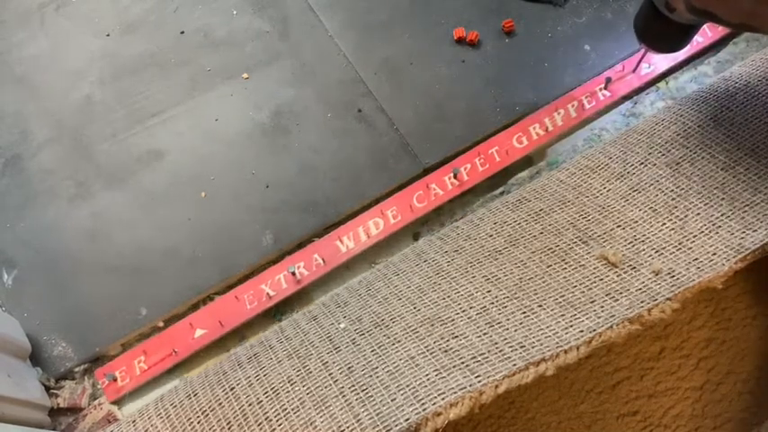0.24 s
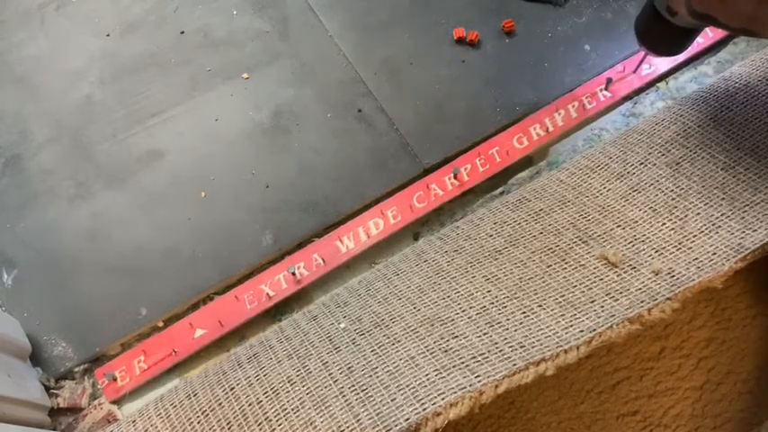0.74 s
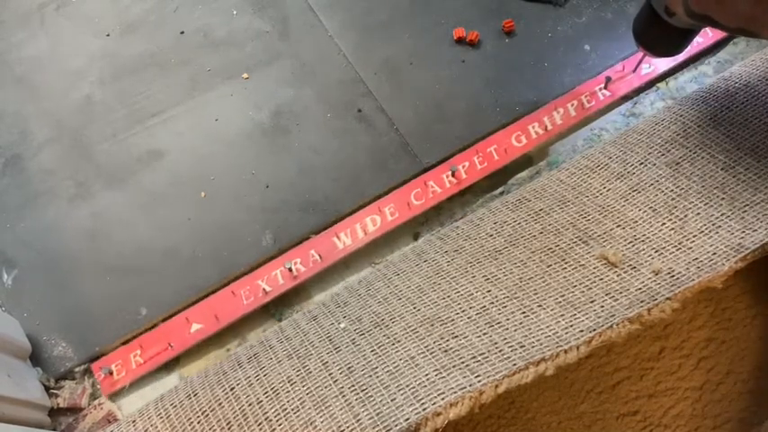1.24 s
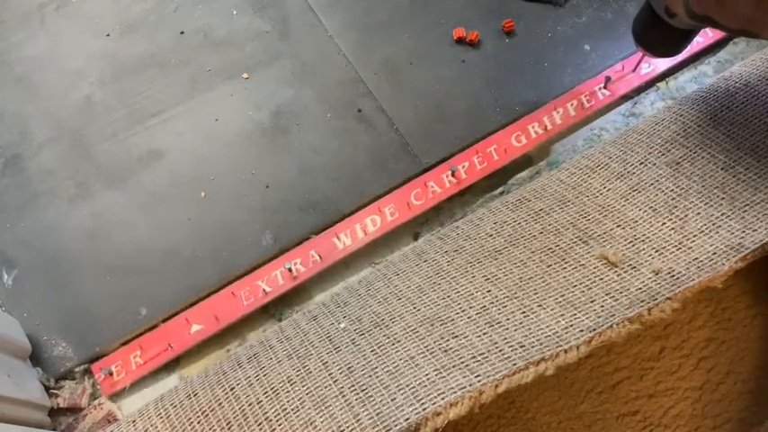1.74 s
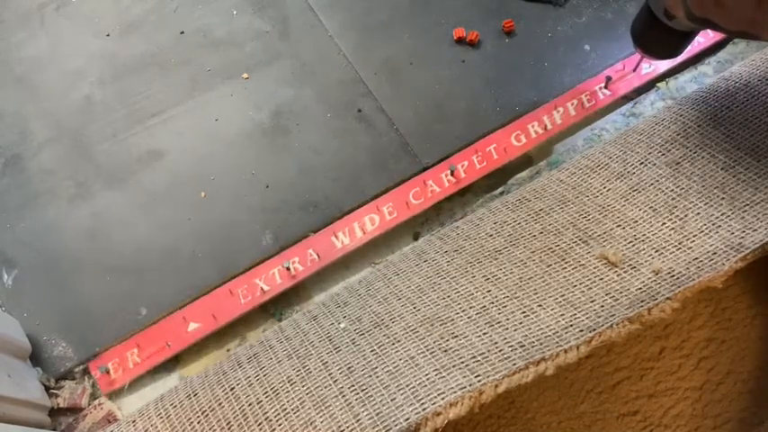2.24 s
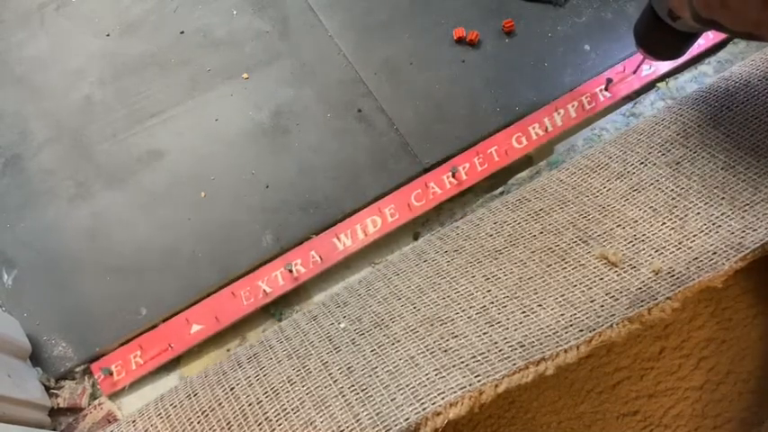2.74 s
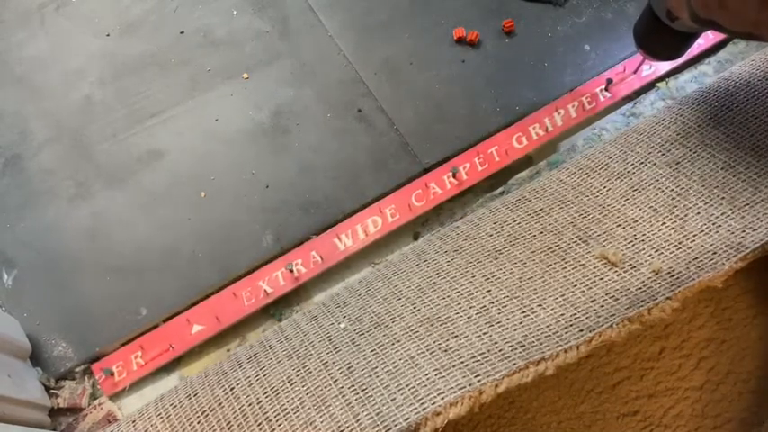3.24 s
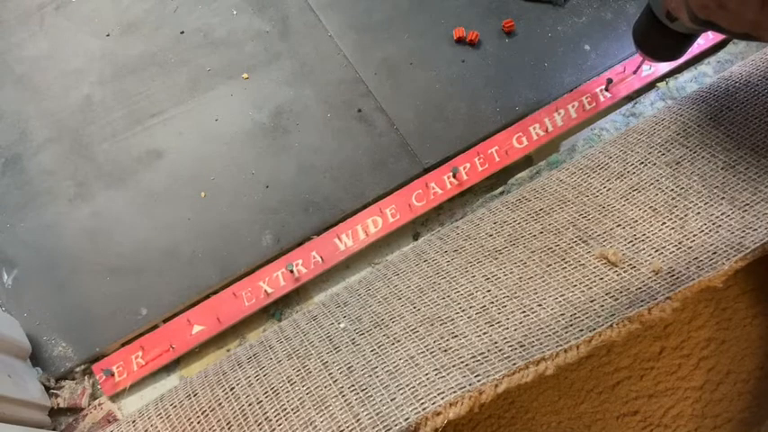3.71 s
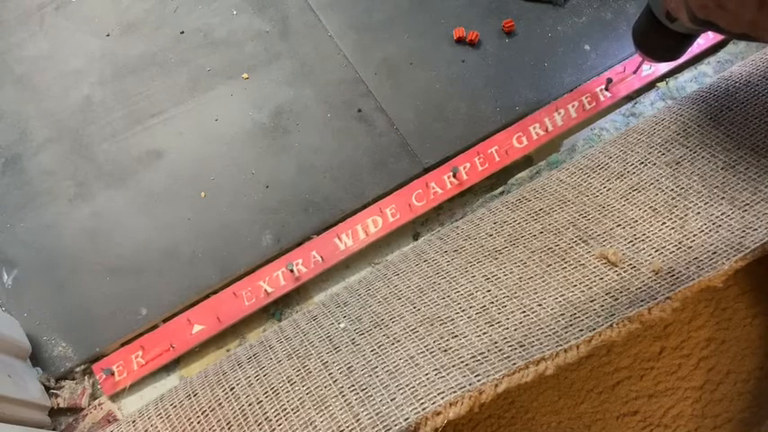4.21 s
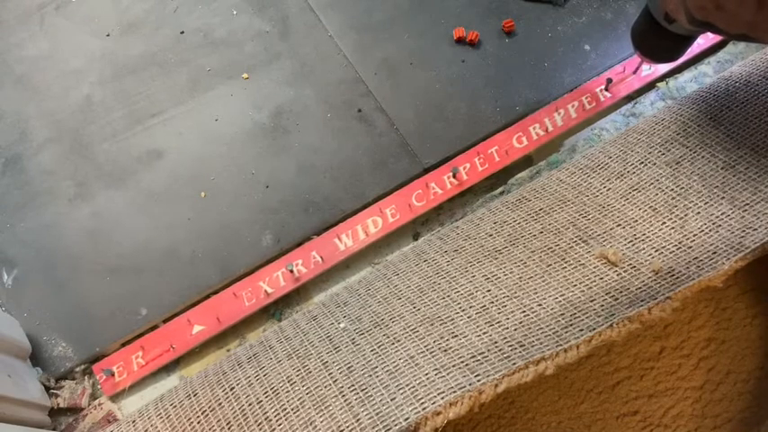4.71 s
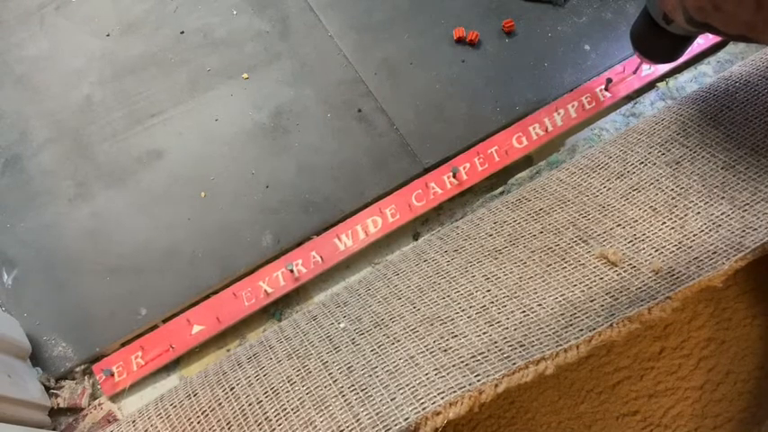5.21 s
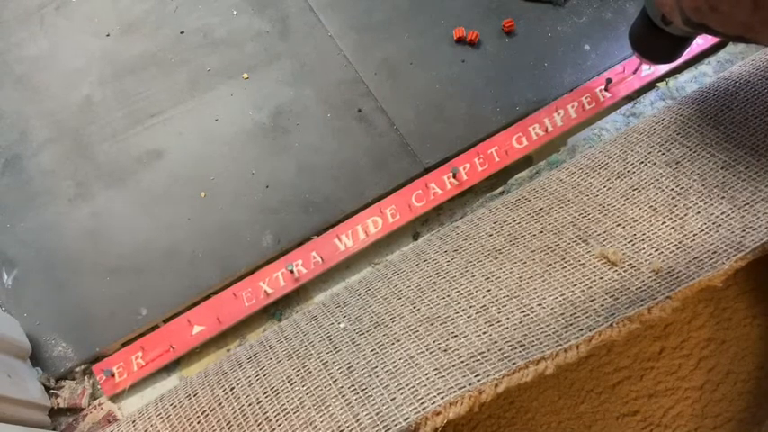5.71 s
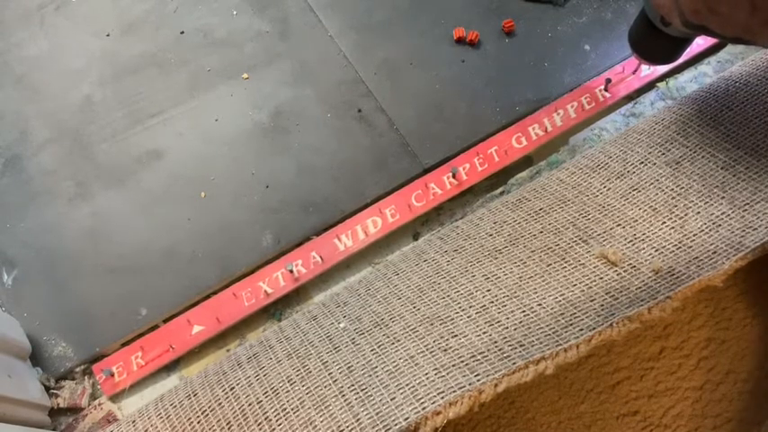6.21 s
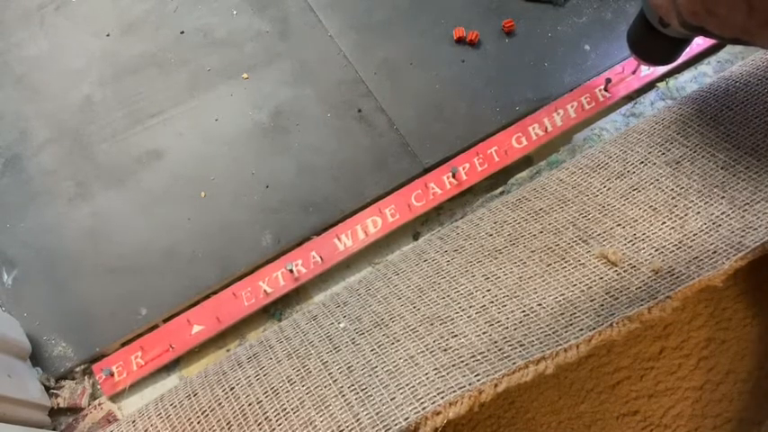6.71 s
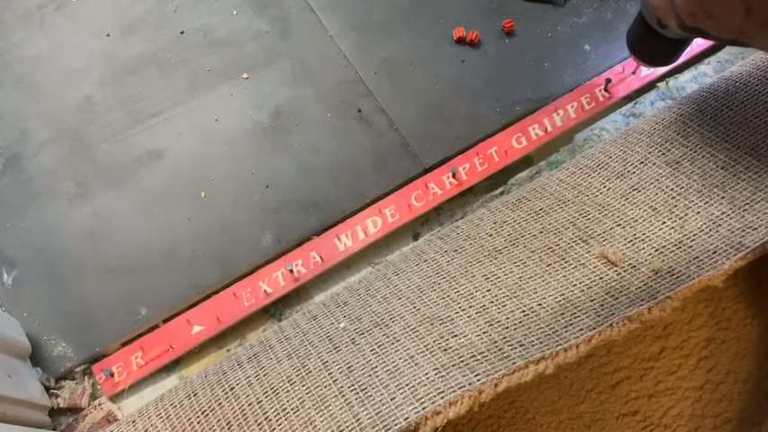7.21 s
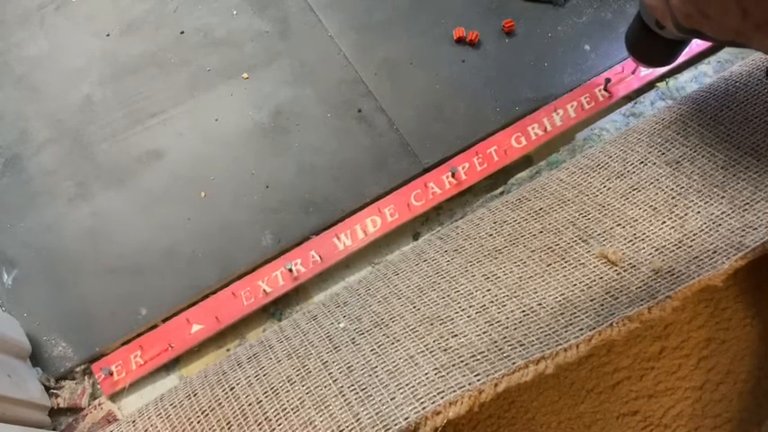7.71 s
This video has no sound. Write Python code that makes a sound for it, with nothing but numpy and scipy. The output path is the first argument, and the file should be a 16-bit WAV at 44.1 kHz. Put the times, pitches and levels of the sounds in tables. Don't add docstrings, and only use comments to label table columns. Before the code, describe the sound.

A hammer drill is already running at full tilt and never stops. Very fast blows fuse into a buzzing hum with a hard whine above, wrapped in crunching concrete and hissing grit. Around five seconds it bogs down to a lower pitch and continues with rough little flutters. Close stereo microphones in a bare, reflective room.

```python
import sys
import numpy as np
from scipy import signal
from scipy.fft import rfft, irfft, next_fast_len
from scipy.io import wavfile
from scipy.ndimage import uniform_filter1d, map_coordinates

SR = 44100
rng = np.random.default_rng(int(sys.argv[2]) if len(sys.argv) > 2 else 0)


def to_wav(sig):
    pcm = np.clip(np.atleast_2d(sig), -1, 1) * 32767
    pcm = np.round(pcm).astype(np.int16)
    wavfile.write(sys.argv[1], SR, pcm.T)


def ratio(d):
    e = np.asarray(d, float) / 20
    return 10 ** e


N = 350595
TEETH = 15


def unit(x):
    return x / np.sqrt(np.mean(x ** 2) + 1e-20)


def along(points, hz):
    f, v = np.transpose(points)
    return np.interp(np.log(hz + 1), np.log(f + 1), v)


def curve(rows):
    s, value = np.transpose(rows)
    return np.interp(np.arange(N) / SR, s, value)


def moments(rows, width_s):
    t = np.arange(0, N + 64, 64) / SR
    bells = sum(h * np.exp(-((t - s) / width_s) ** 2) for s, h in rows)
    return np.interp(np.arange(N) / SR, t, bells)


def wobble(rate_hz):
    coarse = np.arange(0, N + 64, 64)
    knots = rng.standard_normal(int(N * 200 / SR) + 8)
    values = map_coordinates(knots, [coarse * min(rate_hz, 200) / SR])
    return np.interp(np.arange(N), coarse, values)


def filtered(x, response):
    m = next_fast_len(N + SR // 2)
    return irfft(rfft(x, m) * response(np.fft.rfftfreq(m, 1 / SR)), m)[..., :N]


def causal(spectrum):
    def response(hz):
        cepstrum = irfft(np.log(ratio(along(spectrum, hz)) + 1e-6))
        half = len(cepstrum) // 2
        cepstrum[1:half] *= 2
        cepstrum[half + 1:] = 0
        return np.exp(rfft(cepstrum))
    return response


def patchy(x, depth_db):
    z = signal.stft(x, nperseg=128)[2]
    field = rng.standard_normal(z.shape)
    field = uniform_filter1d(uniform_filter1d(field, 6, 0), 24, 1)
    return signal.istft(z * ratio(depth_db * unit(field)), nperseg=128)[1][:N]


# time in seconds, blows per second.
RATCHET_HZ = [(0.0, 268.7), (1.05, 262.0), (1.24, 265.2), (1.47, 264.3), (1.6, 265.9), (2.49, 259.0),
              (3.09, 262.7), (3.4, 261.7), (3.53, 255.1), (4.22, 261.8), (4.98, 256.4), (5.21, 244.7),
              (5.23, 230.9), (5.6, 223.2), (6.48, 222.3), (7.3, 223.0), (7.59, 219.4), (7.95, 219.3)]
# time in seconds, change in blows per second.
CATCHES_HZ = [(.02, 1.5), (.34, .5), (.66, -2.5), (.92, 2.5), (1.74, -2.5), (1.9, -2.5), (2.28, 2.03),
              (3.82, 1.33), (4.03, -3), (4.47, 2.35), (4.66, -0.8), (4.9, -2.76), (5.34, 3), (5.74, -1),
              (5.83, 3), (6.0, -1.5), (6.06, 0.5), (6.13, 0), (6.4, 3.14), (6.72, 2), (6.83, -0.5),
              (6.92, 1), (7.02, -1), (7.08, 0.5), (7.17, -0.36), (7.22, 0.9), (7.37, -1.35)]


def ratchet_speed():
    return curve(RATCHET_HZ) + moments(CATCHES_HZ, width_s=.05)


def ratchet_turns(rate):
    runout_hz = 1.5 * np.sin(2 * np.pi * np.cumsum(rate) / SR / TEETH + 1.3 * wobble(3))
    return np.cumsum(rate + runout_hz + 0.8 * wobble(50)) / SR


# multiple of the blow rate, level in dB.
FREE_ORDERS_DB = [(1, 11), (2, 2), (3, -4.5), (4, -0.5), (5, 0), (6, 0), (7, -2.5), (8, -8.5), (9, -1),
                  (10, -8.5), (11, -7), (12, -6), (13, -9), (14, -38), (15, -36), (16, -8.5)]
# multiple of the blow rate, level in dB.
LOADED_ORDERS_DB = [(1, 8.5), (2, 6), (3, -1), (4, -6), (5, 2), (6, -3), (7, -6), (8, -4), (9, -9.5),
                    (10, -5.5), (11, -8.5), (12, -31), (13, -8.5), (14, -12), (15, -17), (16, -39)]
# centre in Hz, half width in Hz, gain in dB.
STANDING_WAVES_DB = [(222.5, 3.3, -6.5), (262.5, 1.58, -7.9), (277, 0.67, -15), (442.9, 1.8, -15),
                     (516, 3.1, -12.5), (529, 1.8, -7), (546, 3.7, 15), (685, 7.8, -9), (663.8, 6.3, 4.5),
                     (780.5, 5.4, -16), (785.4, 12.4, 7), (798.5, 1.1, -25),
                     (1054.5, 3.4, -5), (1098, 5.4, -5.3), (1235, 20, 5), (1296.7, 8, -7), (1320, 6, -8),
                 (1554, 4, -3), (1580, 13, 2), (1612, 11, -5), (1835, 14, 3), (1985, 30, 6), (2285, 30, 3),
                 (2394, 16, 6), (3159, 27, 5), (3240, 22, 11)]


def orders(rate, load):
    ring_db, settle_s = -37.5, 0.016
    sink_hz_per_s, sink_ends_s = 0.6, 2.3
    hz = np.arange(0, 5000, .25)
    waves_db = sum(db * np.exp(-((hz - c) / w) ** 2) for c, w, db in STANDING_WAVES_DB)
    raised_hz = sink_hz_per_s * np.clip(sink_ends_s - np.arange(N) / SR, 0, None)
    levels_db = []
    for k, ((_, free), (_, loaded)) in enumerate(zip(FREE_ORDERS_DB, LOADED_ORDERS_DB), start=1):
        order_hz = k * rate - (k == 1) * raised_hz
        lag = int(settle_s * SR / k)
        passed_db = np.interp(order_hz, hz, waves_db)
        passed_db = uniform_filter1d(passed_db, 2 * lag + 1, origin=lag, mode="nearest")
        levels_db.append(ring_db + free + load * (loaded - free) + passed_db)
    return levels_db


# time in seconds, change in dB.
SKIPS_DB = [(5.48, -2), (5.58, 1), (5.75, -2), (6.22, -8), (6.32, 1.5), (6.37, -5), (6.51, -2), (6.63, 0),
            (6.7, 0), (6.83, -6), (6.9, -0.5), (7.16, -8), (7.22, -1), (7.5, -5)]


def floor_hum(turns, orders_db):
    skip_db = moments(SKIPS_DB, width_s=.018)
    hum = 0
    for k, db, lag in zip((1, 2, 3), orders_db, (2.1, .3, .3)):
        swell_db = 0.88 * k * np.sin(2 * np.pi * turns / TEETH + 3.7 * wobble(1.9))
        level_db = db + 2.5 + skip_db + 0.47 * k * wobble(28) + swell_db
        hum = hum + ratio(level_db) * np.cos(2 * np.pi * k * turns + lag)
    return hum


def whine(turns, orders_db):
    tones = 0
    for k, db in enumerate(orders_db[3:], start=4):
        beat_db = 1.5 * np.sin(2 * np.pi * turns / TEETH + 2.7 * wobble(3))
        level_db = db + 1.35 * wobble(45) + beat_db
        drift = 0.24 * wobble(3.3) + 0.0097 * k * k * wobble(60)
        tones = tones + ratio(level_db) * np.cos(2 * np.pi * k * turns - 0.47 * k + drift)
    return ratio(5.0) * tones


def blows(turns, jitter_s):
    tooth = np.arange(1, int(turns[-1]))
    at = np.interp(tooth, turns, np.arange(N)) + jitter_s * SR * rng.standard_normal(len(tooth))
    worn_db = rng.standard_normal(TEETH)[tooth % TEETH]
    return np.bincount(np.clip(np.round(at).astype(int), 0, N - 1), ratio(worn_db), N)


def after(spikes, decay_s):
    t = np.arange(SR // 50) / SR
    swell = np.exp(-t / decay_s) * (1 - np.exp(-t / 0.00031))
    return unit(signal.fftconvolve(spikes, swell)[:N])


# time in seconds, level in dB.
LEAN_DB = [(0, 2), (.07, 0.5), (.5, 0), (1.5, 0.5), (2.4, .5), (3.4, 0), (4.4, 0), (4.9, 0), (5.15, .5),
           (5.35, 0.5), (5.7, 0), (6.8, 1), (7.95, 0.5)]


def pressed(free_db, loaded_db, load):
    return free_db + load * (loaded_db - free_db) + curve(LEAN_DB)


# frequency in Hz, level in dB per Hz.
KNOCK_COLOUR_DB = [(500, -30), (850, -16), (1030, -10.5), (1300, -2), (1590, -11.5), (2060, -2),
                   (2420, -11.5), (2930, -10), (5000, -7), (6500, -46), (11000, -120)]


def body_knock(spikes):
    return unit(filtered(spikes, causal(KNOCK_COLOUR_DB)))


# frequency in Hz, level in dB per Hz.
GRIND_COLOUR_DB = [(24, -78), (40, -89), (150, -26), (240, -11.5), (330, -17), (480, -14), (640, -21),
                   (900, -18.5), (1280, -12.5), (1600, -8), (2500, -10.5), (4000, -13), (5200, -17.5),
                   (8800, -120)]


def crushing(spikes):
    noise = (0.71 + after(spikes, decay_s=0.0019)) * rng.standard_normal(N)
    return unit(filtered(noise, lambda hz: ratio(along(GRIND_COLOUR_DB, hz))))


# time in seconds, dB over the rumble.
JARS_DB = [(0, 5), (1.13, -1), (1.28, 4), (1.68, 0), (2.0, 3), (2.3, -5), (3.5, 3), (3.81, -2), (4.01, 0),
           (4.35, 3), (4.72, 4), (4.86, 2), (5.02, 5.5), (5.12, 7), (5.36, 12), (5.52, 9), (5.75, 4),
           (6.0, 3), (6.23, 6), (6.38, 8), (6.75, 9), (7.0, 6), (7.16, 1), (7.5, -1), (7.72, 0), (7.95, 5)]


def rumble_level(rate, load, hum_db):
    light_hz, light_db_per_hz = 259.4, -0.53
    level_db = pressed(-51.5, -56, load) + 0.15 * (hum_db - hum_db.max())
    level_db = level_db + 2.5 * wobble(22) + moments(JARS_DB, width_s=0.059)
    return level_db + light_db_per_hz * np.clip(rate - light_hz, 0, None)


def body(spikes, knock_db, rumble_db):
    crush = crushing(spikes)
    rumble = filtered(crush, lambda hz: np.clip(3.2 - hz / 300, 0, 1))
    knock = ratio(knock_db - 12) * body_knock(spikes)
    upper = ratio(knock_db - 7.5) * patchy(crush - rumble, depth_db=2.1)
    return knock + upper + ratio(rumble_db + 7) * unit(rumble)


# frequency in Hz, level in dB per Hz.
GRIT_COLOUR_DB = [(2500, -23.5), (3500, -13), (5000, -10), (6000, -7.5), (7200, -3), (8200, 1), (9400, 6.5),
                  (10500, 1.5), (12500, -0.5), (14000, -2), (15200, 2.5), (16200, -23)]
# centre in Hz, width in Hz, boost in dB.
BIT_SING_DB = [
    (5914, 234, -5),
    (4800, 220, -3),
]


def grit_spray(spikes, load):
    fan_lag_s = .3
    hiss = 1.73 * rng.standard_normal(N)
    hiss = filtered(hiss, lambda hz: ratio(-9 * np.clip(hz / 4000 - 1.2, 0, 1)))
    spray = after(spikes, decay_s=0.0021) * rng.standard_normal(N)
    grit = patchy(hiss + spray, depth_db=0.32)
    grit = unit(filtered(grit, lambda hz: ratio(along(GRIT_COLOUR_DB, hz))))
    fizz = filtered(grit, lambda hz: np.clip(hz / 2500 - 4.1, 0, 1))
    free, loaded = (filtered(grit, lambda hz: ratio(db) * np.exp(-((hz - c) / w) ** 2))
                    for c, w, db in BIT_SING_DB)
    slowed = uniform_filter1d(load, int(fan_lag_s * SR))
    return grit - 0.38 * slowed * fizz + (1 - load) * free + load * loaded


def drill():
    rate = ratchet_speed()
    load = np.clip((250 - rate) / 22, 0, 1)
    orders_db = orders(rate, load)
    turns = ratchet_turns(rate)
    spikes = blows(turns, jitter_s=.00008)
    knock_db = pressed(-28, -28.5, load) + 0.45 * wobble(12)
    grit_db = pressed(-28, -29.5, load)
    rattle = body(spikes, knock_db, rumble_level(rate, load, orders_db[0]))
    rattle = rattle + ratio(grit_db + 2.5) * grit_spray(spikes, load)
    return floor_hum(turns, orders_db), whine(turns, orders_db), rattle


# frequency in Hz, level in dB.
LEFT_OVER_RIGHT_DB = [(200, -.3), (600, -.2), (1400, 1.2), (2400, 0), (3200, -2), (4000, -1), (5200, -5.5),
                      (6000, -5.5), (6800, -2), (7800, 0)]
# frequency in Hz, left lead in radians.
LEAD_RAD = [(0, -0.26), (222, 0.68), (258, 0.21), (700, 0.8), (1500, -0.96), (2300, 0.83), (3500, 1.34),
            (4200, 1.44),
            (6000, 0), (15950, -4 * np.pi)]


def pair(x):
    f, lead = np.transpose(LEAD_RAD)

    def both(hz):
        half = ratio(along(LEFT_OVER_RIGHT_DB, hz) / 2) * np.exp(.5j * np.interp(hz, f, lead))
        return np.array([half, 1 / half])
    return filtered(x, both)


# frequency in Hz, t60 in seconds.
ROOM_T60_S = [(200, 0.78), (2000, 0.49), (10000, 0.27)]
# frequency in Hz, level in dB.
WET_DB = [(100, -33), (300, -15), (650, -7), (900, 6), (2000, -2.5), (4000, -3), (5500, -1.5),
          (7000, -3), (8000, -10), (16000, -9)]


def room(x):
    hz, t, z = signal.stft(rng.standard_normal((2, SR // 2)), SR, nperseg=256)
    decay = ratio(-60 * t / along(ROOM_T60_S, hz)[:, None])
    tail = signal.istft(z * decay, SR, nperseg=256)[1]
    late = np.pad(x, (150, 0))[None]
    wet = signal.fftconvolve(late, tail / np.linalg.norm(tail[0]), axes=1)[:, :N]
    return filtered(wet, lambda hz: ratio(along(WET_DB, hz)
                                        + along(LEFT_OVER_RIGHT_DB, hz) / [[2], [-2]]))


def scene():
    hum, ring, rattle = drill()
    return pair(hum + ring + rattle) + room(rattle + ratio(-11.5) * ring + ratio(-14) * hum)


# frequency in Hz, limit in dB.
KEEP_LIMIT_DB = [(6000, -30), (7400, -10.5), (9000, -8), (11000, -6), (12700, -2), (14000, -2.5),
                 (16000, -2.5)]


def thrift(x):
    mid_side = [x[0] + x[1], x[0] - x[1]]
    hz, _, z = signal.stft(mid_side, SR, nperseg=2048, noverlap=1024)
    bands = np.abs(z[:, :1024]).reshape(2, 64, 16, -1)
    level_db = 10 * np.log10(np.mean(bands ** 2, 2) + 1e-20)
    limit_db = along(KEEP_LIMIT_DB, hz[8:1024:16])[:, None] + 1.5 * rng.standard_normal(level_db.shape)
    kept = np.repeat(level_db - level_db[::-1] > limit_db, 16, 1)
    kept = np.pad(kept, ((0, 0), (0, 1), (0, 0)))
    mid, side = signal.istft(z * kept, SR, nperseg=2048, noverlap=1024)[1][:, :N]
    return np.array([mid + side, mid - side]) / 2


def low_pass(x):
    return signal.sosfilt(signal.butter(12, 16350, fs=SR, output="sos"), x)


def record(dry):
    band = filtered(dry, lambda hz: (hz < 15900) / (1 + (90 / (hz + 1)) ** 2))
    return low_pass(thrift(band))


dry = scene()
out = record(dry)
to_wav(out)
```